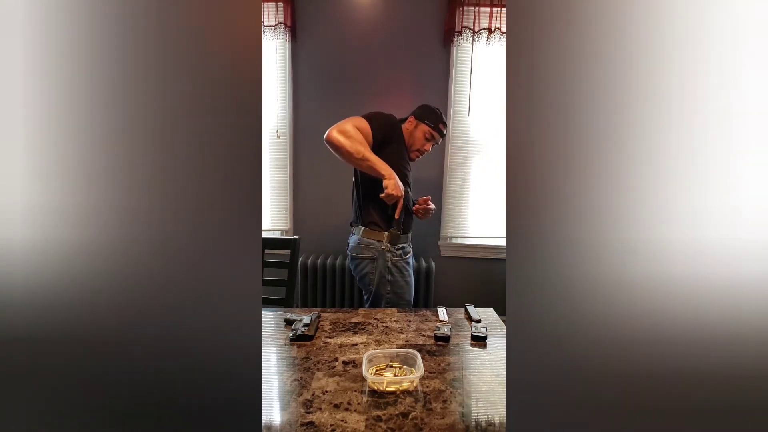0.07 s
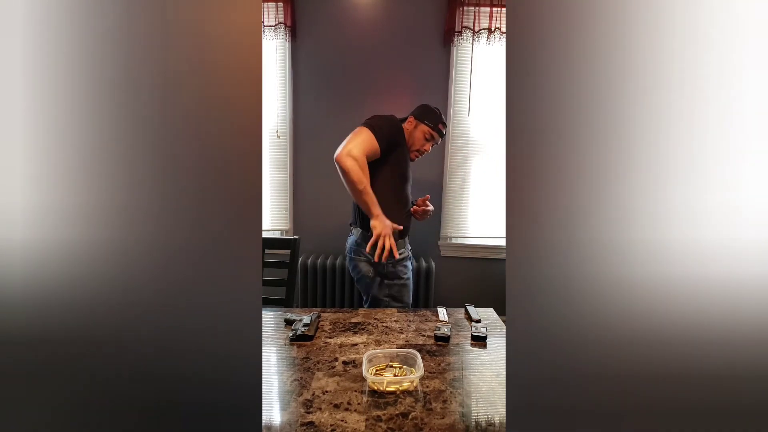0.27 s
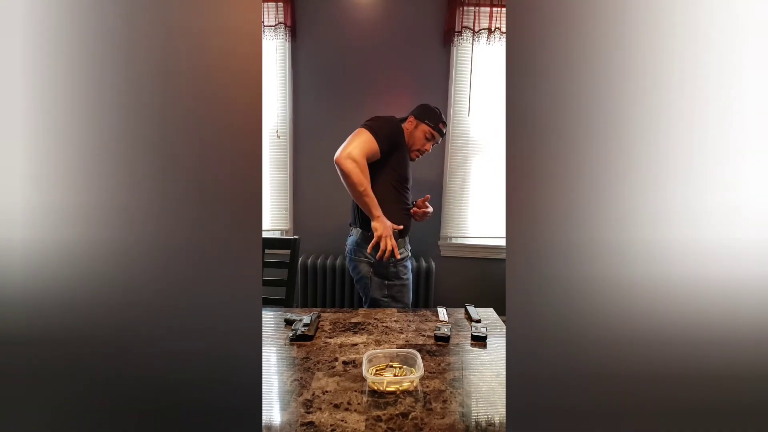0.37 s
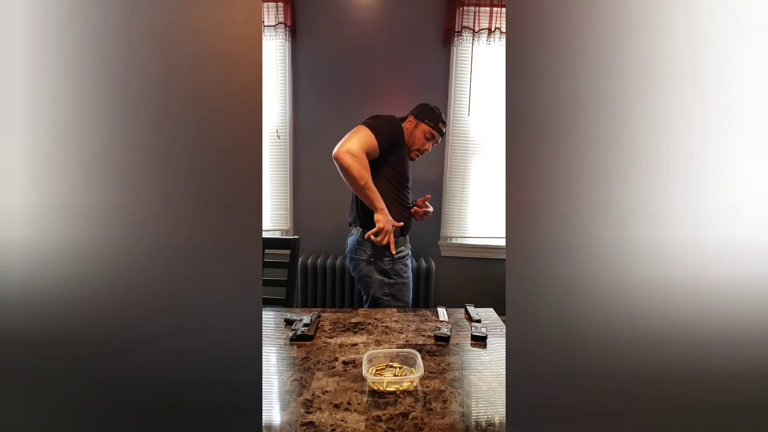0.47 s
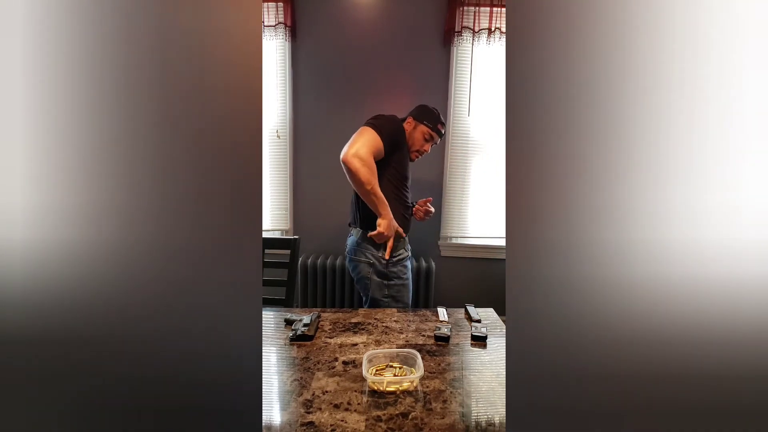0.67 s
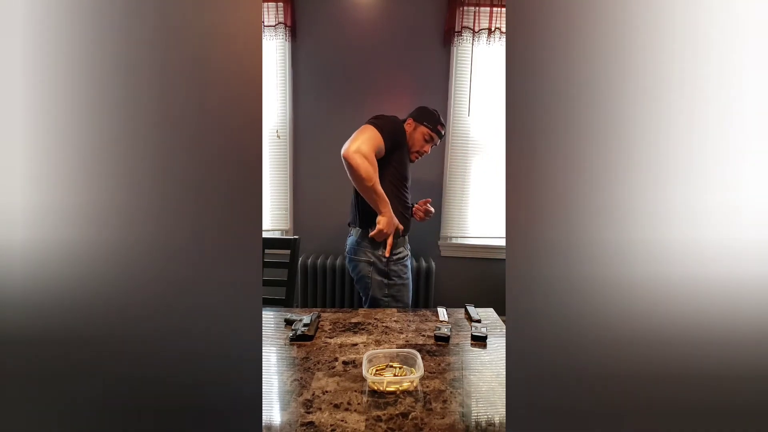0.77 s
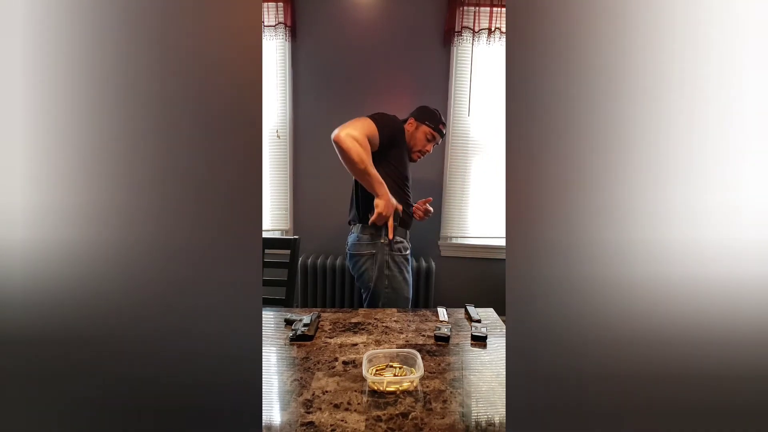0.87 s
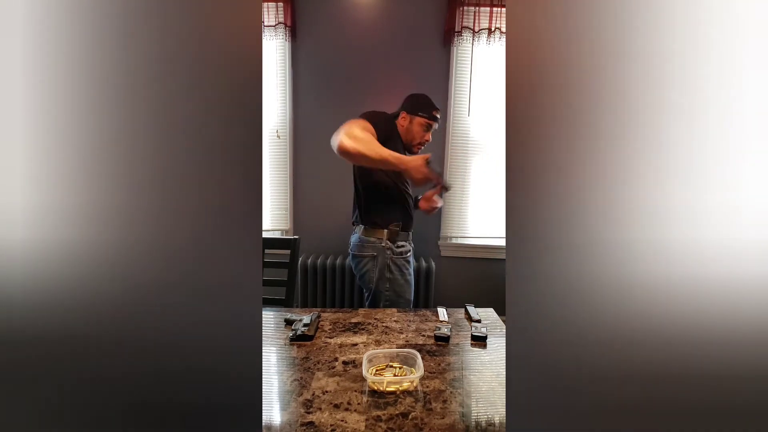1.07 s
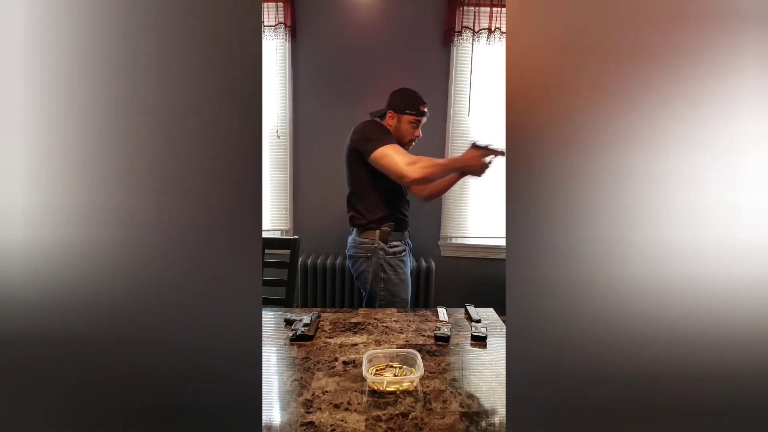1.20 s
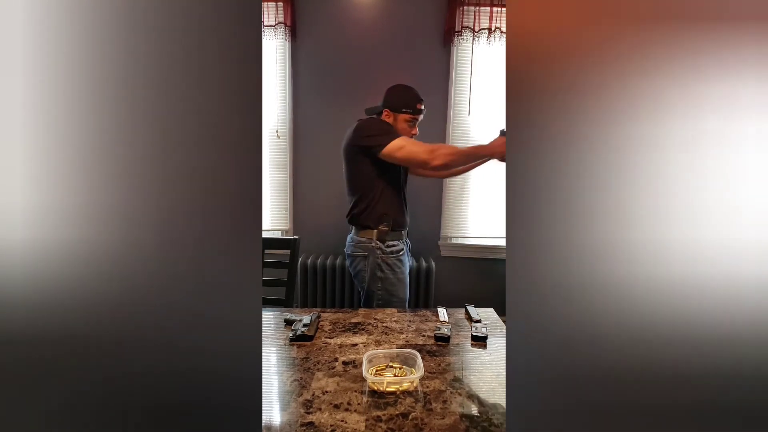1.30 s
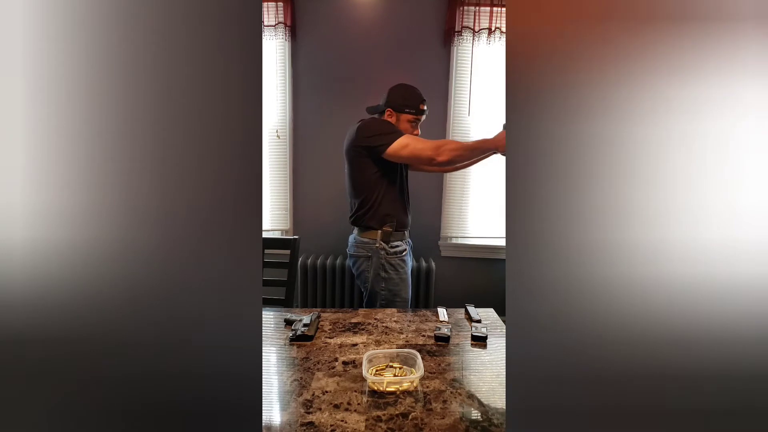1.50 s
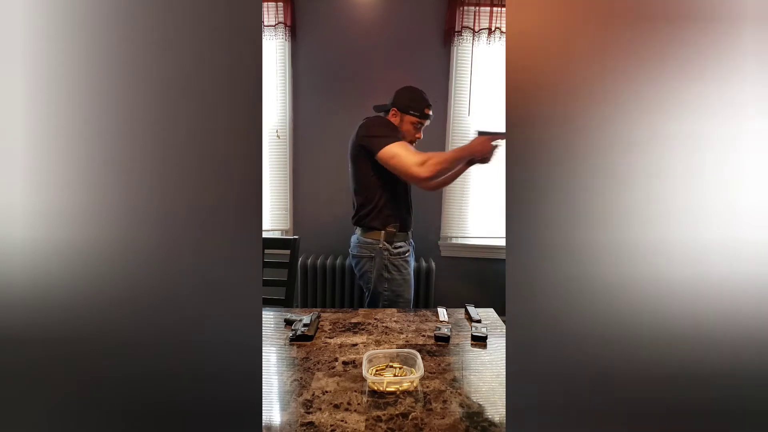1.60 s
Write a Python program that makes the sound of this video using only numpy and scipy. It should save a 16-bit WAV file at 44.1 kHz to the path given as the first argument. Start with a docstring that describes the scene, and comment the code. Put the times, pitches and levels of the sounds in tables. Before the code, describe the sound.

Short hollow holster scrapes and clicks with cloth swishes, two brief bursts in an echoing bare room

```python
"""Pistol and holster indoors

A pistol is pushed into a stiff holster and drawn again in a quiet, bare room.
Rough little slips and short knocks make the hollow holster shell ring; many tiny clicks make the cloth swish.
Shaped noise and two wavering tones give the faint rumble, hiss and mains hum below.
Two unlike microphones, the right one facing the scene, hear more echo than direct sound."""
import sys
import numpy as np
from scipy import signal
from scipy.fft import rfft, irfft, next_fast_len
from scipy.io import wavfile

SR = 44100
rng = np.random.default_rng(int(sys.argv[2]) if len(sys.argv) > 2 else 0)


def generate_wav(sig):
    """Save sig (samples, or channels by samples) to the path in sys.argv[1] as 16-bit PCM at SR."""
    pcm = np.round(np.clip(np.atleast_2d(sig).T, -1, 1) * 32767).astype(np.int16)
    wavfile.write(sys.argv[1], SR, pcm)


def makeup_ratio(level_db):
    """Linear amplitude ratio for a level in decibels (20 dB per factor of ten)."""
    decades = np.asarray(level_db, float) / 20
    return 10 ** decades


N = 72765

# Rumble and hiss of the still room, tone colour: pitch_hz, left_db, right_db (relative, per Hz)
AIR_COLOUR = [(25.7, -26, -11.5), (57.7, -3, -9), (77, -14, 12), (93, -5, 2.5), (153, -15.5, 0),
              (198, -1.5, 5.5), (290, -17, -5), (600, -24, -17), (1200, -28.5, -30.5), (1960, -27.5, -24.5),
              (2450, -22.5, -37), (3500, -30.5, -34.5), (6300, -41.5, -44), (8400, -52, -46.5),
              (9800, -39.5, -43.5), (13200, -32, -28), (16900, -33.5, -42)]
# How alike the rumble and hiss are on both sides: pitch_hz, likeness (0 to 1)
AIR_LIKENESS = [(40, .92), (150, 0.29), (500, .4), (2000, .05)]
# Mains hum tones, before the left-right balance: pitch_hz, level_db (rms, before wavering)
HUM_TONES = [(59.3, -63.5), (119.5, -65.5)]
# Echo of the room: pitch_hz, t60_s (time to die by 60 dB), likeness (left to right, 0 to 1)
ROOM_ECHO = [(103, 0.82, 0.44), (300, 0.42, 0.35), (710, 0.42, 0.29), (1400, 0.4, 0.1), (2930, 0.42, 0.036),
             (7000, 0.37, 0.01), (14000, 0.31, 0.01)]
# Tone colour of the two microphones: pitch_hz, left_db, right_db
MIC_COLOUR = [(40.3, -17.5, -9.5), (202, -14, -8), (648, -7.5, 1), (1300, -9.5, 2), (2420, -4.5, 7.5),
              (4230, -12, 8), (5580, -15.5, 6), (6770, -16.5, -0.5), (8460, -13.5, -24.5), (9000, -6, -18),
              (9400, -2.5, -12), (12200, -3.5, 1.5), (14100, -19.5, 0), (15200, -7, 3), (16500, -34.5, -4)]
# Tone colour of swishing cloth: pitch_hz, level_db (relative, per Hz)
SWISH_COLOUR = [(150, -28.5), (300, -12), (500, -5), (1000, 6), (2500, -1.5), (5000, -0.5), (9000, -5.5),
                (16000, -10)]
# Cloth movement over time, before room and microphones: time_s, level_db, extra_treble_db
CLOTH_MOVES = [(0, -57, -17), (.09, -84, -4), (.13, -56, -9), (.175, -56, -4), (.195, -48.5, -5.5),
               (.23, -47.5, 3.5), (.27, -33, -2), (.31, -44.5, 0.5), (.36, -45.5, -2), (.42, -69, -14),
               (.55, -71, -11), (.7, -76.5, 9.5), (.79, -87, 3), (.85, -64.5, -1), (.875, -55.5, 9),
               (.895, -38.5, 3.5), (.93, -41.5, 3), (1.0, -42.5, 2), (1.06, -66.5, -28.5),
               (1.14, -67.5, -2), (1.22, -65, -1), (1.3, -75.5, 1.5), (1.45, -92, -2.5), (1.65, -82, 0.5)]
# Ways the holster shell can ring (its modes): pitch_hz, level_db (relative), t60_s
SHELL_MODES = [(280.7, -18, 0.088), (364, -11, 0.029), (500, 2.5, 0.017), (620, -6.5, 0.019),
               (750, -0.5, 0.014), (813, -6.5, 0.01), (993.3, -7, 0.052), (1129, -1.5, 0.031),
               (1250, 2, 0.015), (1400, -9.5, .025), (1667, 2.5, 0.0085), (1968, 2, 0.01),
               (2574, -3.5, 0.005), (3174, -3, 0.005), (4593, -23.5, 0.022)]
# Slide rubbing in the holster, before room and microphones:
# time_s, level_db, lean_db (per octave above 1000 Hz), rubbed_hz (modes near here are rubbed hardest)
SCRAPE_MOVES = [(0, -46.5, 1, 500), (.03, -66, -11, 600), (.09, -72.5, 14, 645), (.125, -49, -1.5, 646),
                (.15, -64.5, -3, 800), (.183, -55, -6, 1200), (.192, -51.5, 8, 1780),
                (.23, -44.5, -7, 1780), (.25, -34.5, 3.5, 1200), (.282, -37.5, 10, 1180),
                (.305, -51.5, 14, 1160), (.322, -34.5, 1, 1115), (.345, -39.5, -3, 996),
                (.37, -48.5, 3, 1007), (.42, -53, -0.5, 1000), (.455, -47.5, 1, 980),
                (.48, -56.5, -8.5, 620), (.53, -64, -2.5, 990), (.62, -72, -9, 1020),
                (.85, -82.5, -1, 1200), (.885, -47.5, 6.5, 1200), (.898, -33.5, -4, 1230),
                (.909, -42, 4, 1190), (.92, -43.5, -13, 1200), (.95, -49.5, -11, 1200),
                (.99, -45, -9.5, 600), (1.03, -60.5, 3, 1080), (1.12, -79.5, 0.5, 1070),
                (1.65, -102, -10, 1110)]
# Pistol knocking on the shell: time_s (middle of the push), level_db (relative strength of the push),
# contact_s, struck_hz (modes near here are struck hardest)
SHELL_KNOCKS = [(.122, -35, 0.00036, 650), (.1885, -25, 0.00047, 900), (0.2452, -25, 0.00046, 750),
                (0.254, -18, 0.00015, 1200), (.271, -13, 0.00015, 1300), (0.3199, -13.5, 0.000041, 1200),
                (0.3264, -14.5, .0001, 1000), (.343, -15, 0.00078, 950), (.478, -46, 0.00085, 620),
                (0.8949, -18, 0.00041, 1250), (0.904, -19, 0.00055, 1250), (.921, -24, 0.0002, 1200),
                (.954, -24, 0.00067, 450)]


def at_hz(table, hz):
    """Read the columns of a table at any pitch, on a log pitch scale."""
    table_hz, *columns = np.transpose(table)
    log_hz = np.log(np.maximum(hz, 1))
    return np.array([np.interp(log_hz, np.log(table_hz), column) for column in columns])


def in_time(table):
    """Read the columns of a table as curves with one value per sample."""
    time_s, *columns = np.transpose(table)
    return [np.interp(np.arange(N) / SR, time_s, column) for column in columns]


def rms_one(x):
    """Scale a sound so its rms (average strength) is 1."""
    return x / np.sqrt(np.mean(x ** 2) + 1e-20)


def colour(x, table):
    """Make each pitch louder or softer by the dB columns of a table, one column a channel."""
    size = next_fast_len(x.shape[-1] + 4096)
    gain = makeup_ratio(at_hz(table, np.arange(size // 2 + 1) * SR / size))
    return irfft(rfft(x, size) * gain, size)[..., :x.shape[-1]]


def drift(rate_hz):
    """Smooth noise into a random wander with rms 1; a higher rate wanders faster."""
    r = np.exp(-2 * np.pi * rate_hz / SR)
    noise = rng.standard_normal(N + SR)
    # the first second only settles the filter
    return rms_one(signal.lfilter([1], [1, -2 * r, r * r], noise)[SR:])


def grains(rate_per_s, spread_db):
    """Scatter tiny clicks of uneven size and random sign, with rms 1 overall."""
    size_db = spread_db * np.minimum(rng.exponential(1, N), 4)
    sizes = makeup_ratio(size_db) * rng.choice([-1, 1], N)
    return rms_one(sizes * (rng.random(N) < rate_per_s / SR))


def ring(clicks, hz, t60_s):
    """Resonate at one pitch: each unit click starts a dying sine of height 1."""
    r = makeup_ratio(-60 / (t60_s * SR))
    w = 2 * np.pi * hz / SR
    # the tiny offset keeps the filter away from extremely small numbers
    return signal.lfilter([0, np.sin(w)], [1, -2 * r * np.cos(w), r * r], clicks + 1e-18)


def noise_pair(size, likeness):
    """Mix a shared and an opposed noise into left and right spectra of a given likeness."""
    mid, side = rfft(rng.standard_normal((2, size)))
    opposed = side * [[1], [-1]]
    return np.sqrt((1 + likeness) / 2) * mid + np.sqrt((1 - likeness) / 2) * opposed


def air():
    """Rumble of the still room with microphone hiss: steady noise shaped by pitch."""
    likeness = at_hz(AIR_LIKENESS, np.arange(N // 2 + 1) * SR / N)[0]
    noise = irfft(noise_pair(N, likeness), N)
    return makeup_ratio(-62.5) * rms_one(colour(noise, AIR_COLOUR))  # -62.5 dB rms over both sides


def hum():
    """Mains hum: steady sines whose levels waver a little, softer on the left."""
    t = np.arange(N) / SR
    waver_db, balance_db = 1.5, [[-1.0], [1.0]]
    tones = 0
    for hz, level_db in HUM_TONES:
        level = 2 ** .5 * makeup_ratio(level_db + waver_db * drift(1.8))  # root 2 turns rms into peak
        tones = tones + level * np.sin(2 * np.pi * (hz * t + rng.random()))
    return tones * makeup_ratio(balance_db)


def echo_tail():
    """Diffuse echo: noise in octave-spaced bands, each dying at its own speed on both sides."""
    size, first_echo_s = SR // 2, .003
    hz = np.arange(size // 2 + 1) * SR / size
    t = np.arange(size) / SR
    noise = noise_pair(size, at_hz(ROOM_ECHO, hz)[1])
    centres = 60 * 2. ** np.arange(9)
    tail = 0
    for centre in centres:
        octaves_away = abs(np.log2(np.clip(hz, centres[0], centres[-1]) / centre))
        share = np.maximum(0, 1 - octaves_away)
        fall = makeup_ratio(-60 * t / at_hz(ROOM_ECHO, centre)[0]) * (t > first_echo_s)
        tail = tail + irfft(noise * share, size) * fall / np.sqrt(np.sum(fall ** 2))
    return tail


def room(x):
    """Direct sound plus echo; the body moves, so four echo patterns fade into each other in turn."""
    shift_s, places = .07, 4  # time from one pattern to the next, number of patterns
    wet_db, left_lag_s = 1, .0001  # echo against direct sound, delay of the direct sound on the left
    step = np.arange(N) / SR / shift_s
    wet = 0
    for k in range(places):
        steps_away = abs((step - k + 2) % places - 2)
        fade = np.sin(np.pi / 2 * np.maximum(0, 1 - steps_away))
        wet = wet + signal.fftconvolve(x * fade, echo_tail(), axes=1)[:, :N]
    late_left = np.interp(np.arange(N) - left_lag_s * SR, np.arange(N), x[0])
    direct = np.array([late_left, x[1]])
    return (direct + makeup_ratio(wet_db) * wet) / np.sqrt(1 + makeup_ratio(2 * wet_db))


def microphones(x):
    """Each microphone favours its own pitches."""
    return colour(x, MIC_COLOUR)


def cloth():
    """Shirt and jeans swish: dense fibre clicks over a wide area, partly different on each side."""
    level_db, treble_db = in_time(CLOTH_MOVES)
    likeness = .3
    both, left, right = (grains(16000, 2.5) for _ in range(3))  # clicks per second, size spread in dB
    fibres = likeness ** .5 * both + (1 - likeness) ** .5 * np.array([left, right])
    fibres = fibres * makeup_ratio(1.5 * drift(40))
    swish = rms_one(colour(fibres, SWISH_COLOUR))
    treble = colour(swish, [(5080, -40), (6985, 0)])  # pitch_hz, level_db
    return (swish + treble * (makeup_ratio(treble_db) - 1)) * makeup_ratio(level_db)


def knock_pushes():
    """Short, rounded pushes on the shell; a longer contact gives a duller knock."""
    t = np.arange(N) / SR
    pushes = []
    for time_s, level_db, contact_s, _ in SHELL_KNOCKS:
        width_s = contact_s / 4
        push = makeup_ratio(level_db) * np.exp(-.5 * ((t - time_s) / width_s) ** 2)
        area = np.sqrt(2 * np.pi) * SR * width_s
        pushes.append(push / (area * len(SHELL_MODES) ** .5))
    return np.array(pushes)


def holster():
    """The slide sticks and slips along the holster and knocks on it, so its hollow shell rings."""
    rubbed_boost_db, rubbed_octaves, struck_octaves = 10, .22, .6
    slips = grains(5000, 3.5) * makeup_ratio(2.0 * drift(60))  # slips per second, size spread in dB
    even_rub = sum(makeup_ratio(db) * ring(slips, hz, t60_s) for hz, db, t60_s in SHELL_MODES)
    rub_rms = np.sqrt(np.mean(even_rub ** 2))
    level_db, lean_db, rubbed_hz = in_time(SCRAPE_MOVES)
    pushes = knock_pushes()
    # each knock strikes the modes near its own pitch, with some chance in how hard
    mode_hz, struck_hz = np.array(SHELL_MODES)[:, 0], np.array(SHELL_KNOCKS)[:, 3:]
    away = np.log2(mode_hz / struck_hz) / struck_octaves
    strike = makeup_ratio(2 * rng.standard_normal(away.shape)) * np.exp(-away ** 2)
    sound = 0
    for k, (hz, mode_db, t60_s) in enumerate(SHELL_MODES):
        rub_away = np.log2(hz / rubbed_hz) / rubbed_octaves
        near_db = rubbed_boost_db * np.exp(-rub_away ** 2)
        rub_db = level_db + lean_db * np.log2(hz / 1000) + near_db
        rub = slips * makeup_ratio(rub_db) / rub_rms
        knocks = strike[:, k] @ pushes
        sound = sound + makeup_ratio(mode_db) * ring(rub + knocks, hz, t60_s)
    return sound


def scene():
    """Pistol and clothes heard through room and microphones, over rumble, hiss and hum."""
    return microphones(room(holster() + cloth())) + air() + hum()


def top_cut(x):
    """Nothing passes above the cut-off."""
    return signal.sosfilt(signal.butter(12, 15950, fs=SR, output="sos"), x)


def record(dry):
    """Turn the finished mix into the sound that is kept."""
    return top_cut(dry)


dry = scene()
out = record(dry)
generate_wav(out)
```